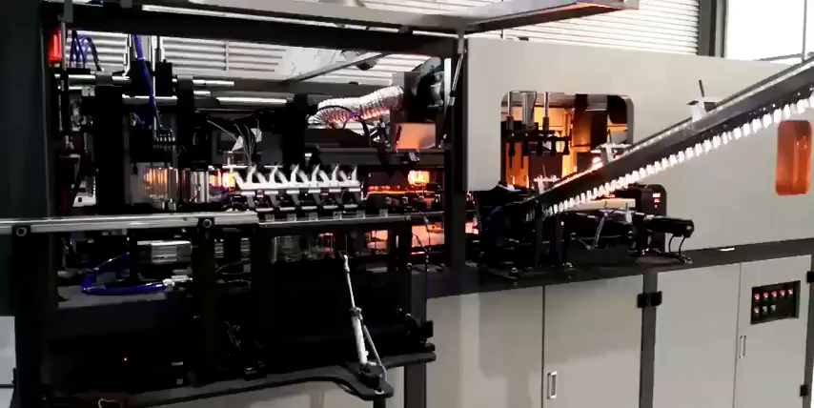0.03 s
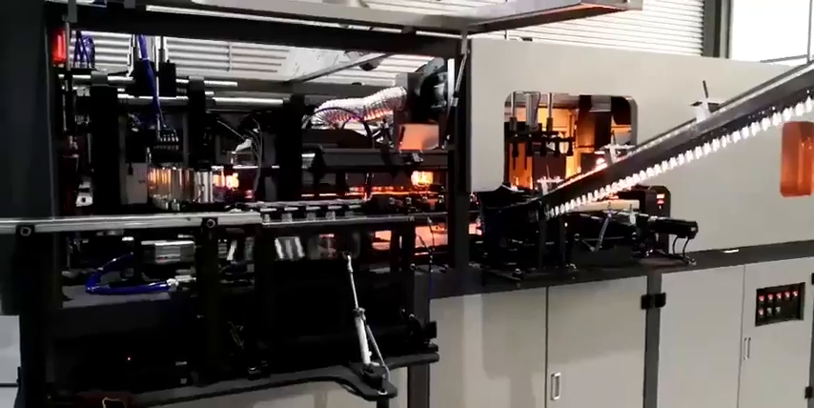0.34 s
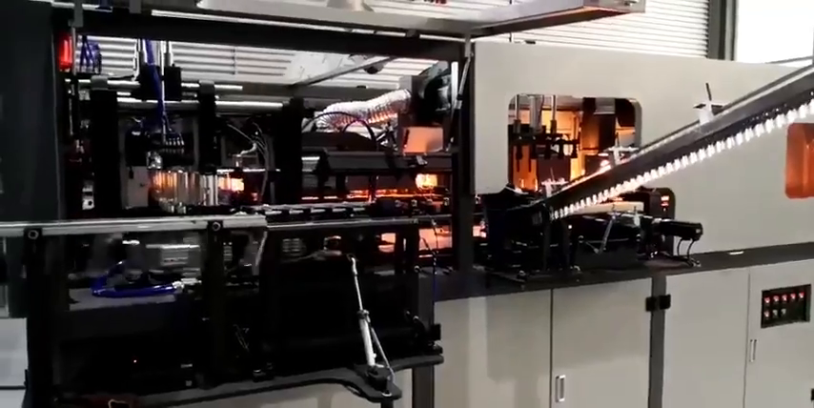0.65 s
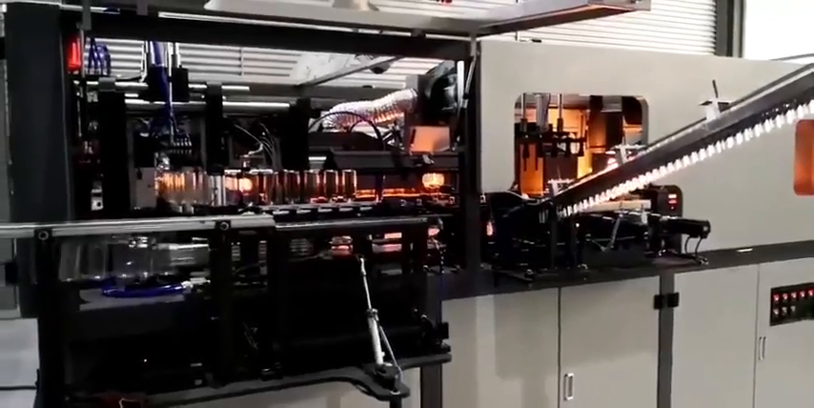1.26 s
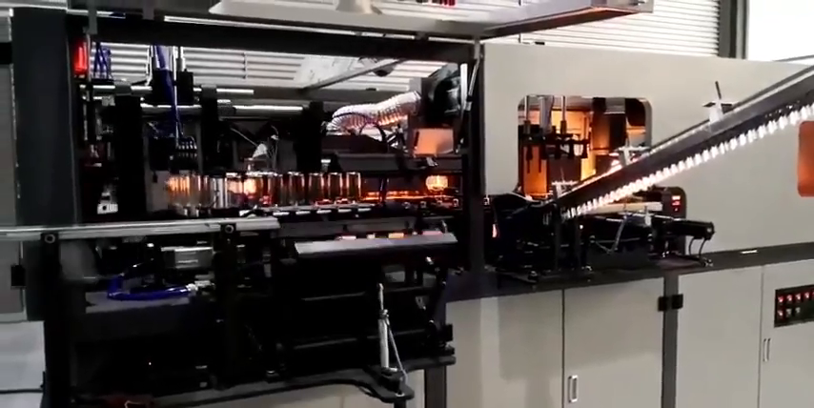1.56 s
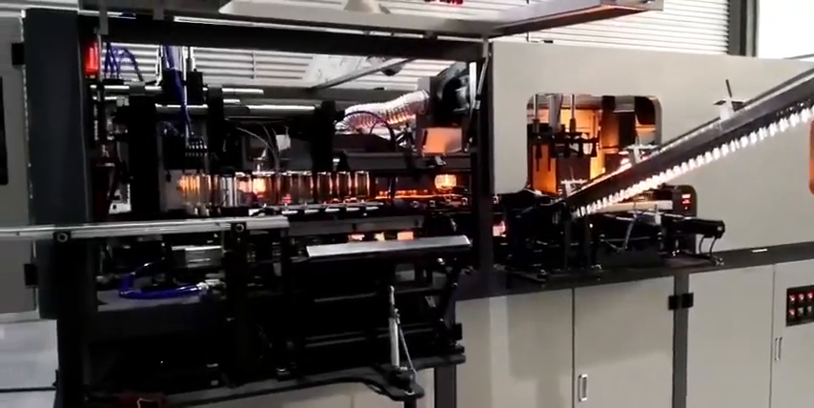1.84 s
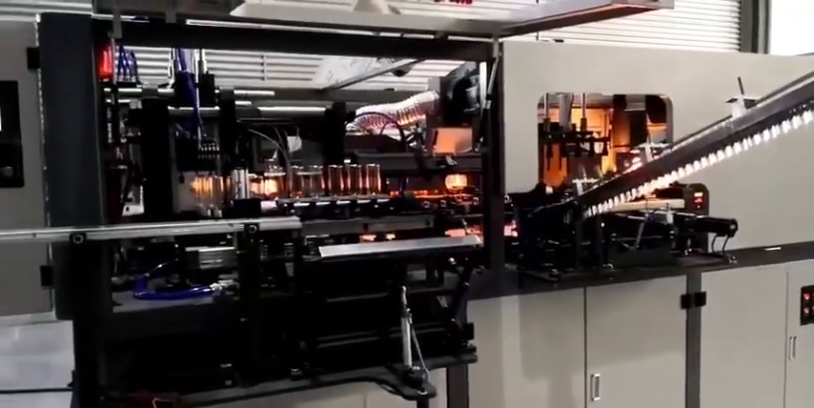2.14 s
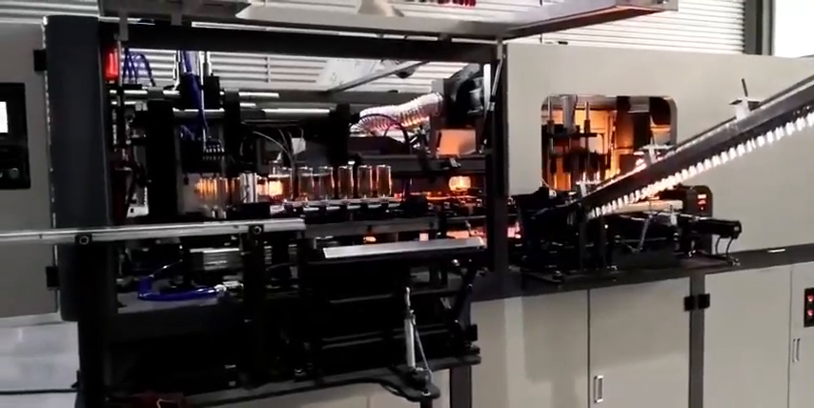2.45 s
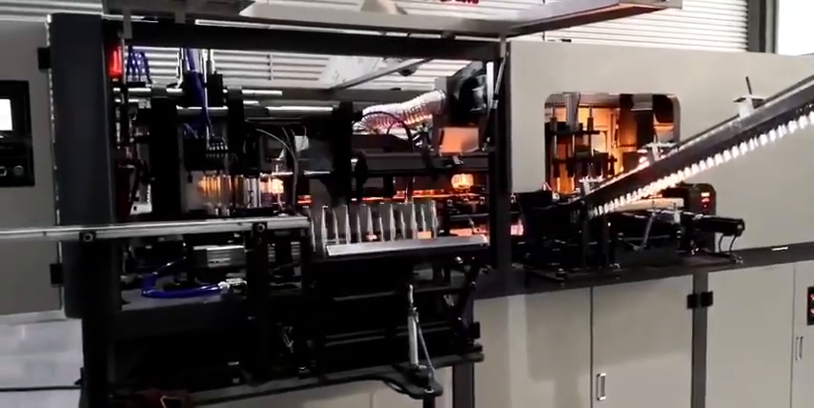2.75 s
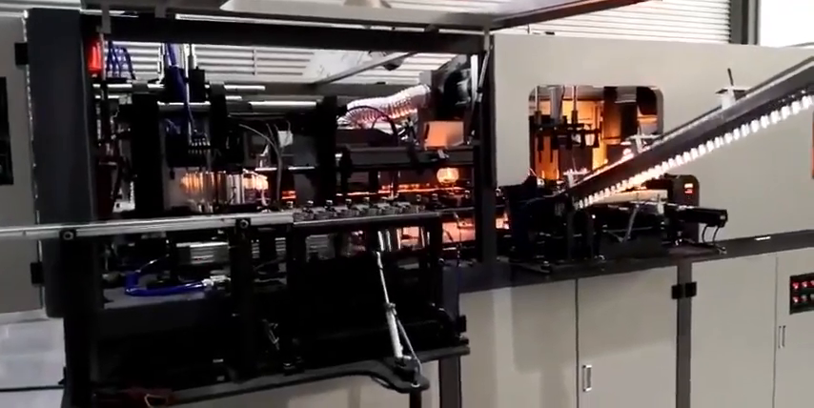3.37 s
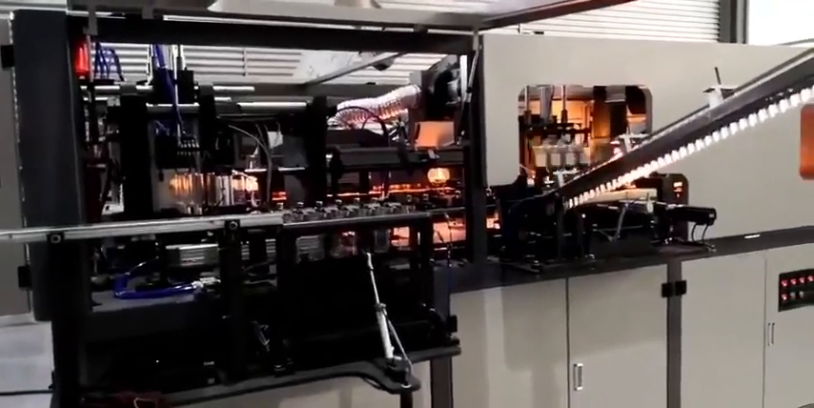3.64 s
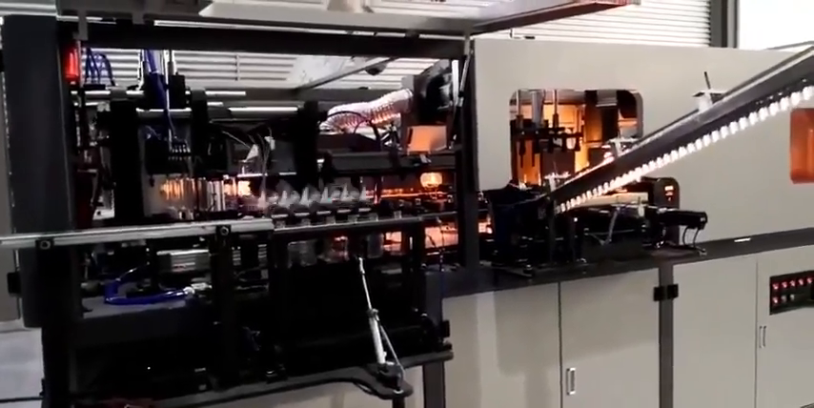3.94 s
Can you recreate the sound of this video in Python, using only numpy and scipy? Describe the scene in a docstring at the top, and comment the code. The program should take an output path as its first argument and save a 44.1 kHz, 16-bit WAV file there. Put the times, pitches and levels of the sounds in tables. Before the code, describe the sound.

In a noisy factory hall, a bottle blow moulding machine cycles over constant hiss and rumble. Two ringing air blasts come first, then sharp metal knocks, clanks and brief high squeals, and finally a third blast.

```python
"""Compressed air vents from a bottle blow moulding machine in three blasts through a ringing muffler.
Between the blasts the mould clamps with a clunk, the end stops knock hard,
and the steel transfer carriage rattles, clanks and squeals along its rail.
Underneath, the drive rumbles and drones, the air lines hiss and the factory hall keeps up its din."""
import sys
import numpy as np
from scipy import signal
from scipy.fft import rfft, irfft, next_fast_len
from scipy.io import wavfile
from scipy.ndimage import map_coordinates

SR = 44100
rng = np.random.default_rng(int(sys.argv[2]) if len(sys.argv) > 2 else 0)


def wav_out(sig):
    """Save sig, one row per channel (or a flat mono array), as 16-bit PCM at SR to the path in sys.argv[1]."""
    wavfile.write(sys.argv[1], SR, np.round(np.clip(np.atleast_2d(sig).T, -1, 1) * 32767).astype(np.int16))


N = 176400


def amp(db):
    """Decibels to gain."""
    return 10 ** (np.asarray(db) / 20)


def unit(x):
    """Scale to rms 1."""
    return x / np.sqrt(np.mean(x ** 2) + 1e-20)


def since(start):
    """Seconds since start, zero before it."""
    return np.maximum(np.arange(N) / SR - start, 0)


def curve(rows):
    """Automation lane through (t/s, value) breakpoints."""
    return np.interp(np.arange(N) / SR, *np.transpose(rows))


def swell(start, length):
    """Envelope that fades in, holds and fades out."""
    t = since(start)
    return np.clip(np.minimum(t, length - t) / 0.018, 0, 1)


def strike(start, db, t60, attack_s):
    """Impact envelope: quick rise, exponential tail."""
    t = since(start)
    return amp(db - 60 * t / t60) * (1 - np.exp(-t / attack_s))


def wobble(per_s):
    """Smooth random modulation with per_s knots a second."""
    return map_coordinates(rng.standard_normal(1024), [np.arange(N) * per_s / SR], mode="wrap")


def filtered(x, response):
    """Filter x by a gain that depends on frequency."""
    size = next_fast_len(N + 8192)
    return irfft(rfft(x, size) * response(np.fft.rfftfreq(size, 1 / SR)), size)[:N]


def colour(x, eq):
    """x through an EQ curve (f/Hz, gain/dB), at rms 1."""
    hz, db = np.transpose(eq)
    return unit(filtered(x, lambda f: amp(np.interp(np.log(f + 1), np.log(hz), db))))


def ring(x, modes):
    """x through resonators (f/Hz, width/Hz, gain/dB), at rms 1."""
    def response(f):
        return sum(amp(db) * 1j * f * width / (hz * hz - f * f + 1j * f * width)
                   for hz, width, db in modes)
    return unit(filtered(x, response))


def noise():
    """White noise."""
    return rng.standard_normal(N)


def eddies(patchy_db, patch_hz=169.4, patch_s=.035):
    """Turbulence whose strength drifts in patches of frequency and time."""
    hz, t, spectrum = signal.stft(noise(), SR, nperseg=512)
    grid = np.meshgrid(hz / patch_hz, t / patch_s, indexing="ij")
    patches = map_coordinates(rng.standard_normal((256, 256)), grid, mode="wrap")
    return signal.istft(spectrum * amp(patchy_db * patches), SR, nperseg=512)[1][:N]


def contacts(per_s, spread_db):
    """Random small impacts of uneven size, at rms 1."""
    clicks = (rng.random(N) < per_s / SR) * np.sign(noise())
    return unit(clicks * amp(spread_db * np.clip(noise(), -2, 2)))


def tone(hz, waver_hz):
    """A resonance whose pitch and strength waver, at rms 1."""
    phase = 2 * np.pi * np.cumsum(hz + waver_hz * wobble(110)) / SR
    return unit(np.sin(phase) * amp(2.2 * wobble(60)))


# Midrange bed of the hall: f/Hz, gain/dB
DIN_EQ = [(100, -29), (900, -18), (1200, -3.5), (1450, 0), (2000, 2), (2400, -2.5), (2900, -7), (3450, -5),
          (4000, -14), (5000, -19), (6000, -28.5), (7500, -32.5)]
# Gentle swells of the bed: t/s, level/dB
DIN_SWELLS = [(.26, -2), (.7, 0), (1.1, -0.5), (1.5, -0.5), (1.88, -2), (2.0, 2.5), (2.19, 1), (2.23, -2.5),
              (2.32, 1), (2.5, 2.5), (2.8, 1), (3.2, 0.5), (3.45, 0), (3.62, 0), (4, -1)]


def hall_din():
    """Air and fine clatter from the rest of the line."""
    stir = eddies(patchy_db=2.4) + .5 * contacts(per_s=500, spread_db=2)
    return amp(curve(DIN_SWELLS) - 20 + .9 * wobble(40)) * colour(stir, DIN_EQ)


# Fader ride of the hiss: t/s, level/dB
HISS_RIDE = [(.26, -25), (.42, -21.5), (.48, -25.5), (.8, -24), (1.1, -24), (1.15, -29), (1.25, -25),
             (1.56, -24), (1.72, -25.5), (1.98, -28.5), (2.12, -36), (2.42, -29.5), (2.75, -35),
             (3.12, -33.5), (3.2, -23.5), (3.35, -36.5), (3.62, -35.5), (3.68, -23), (4, -24.5)]
# Thin, bright hiss: f/Hz, gain/dB
HISS_EQ = [(1000, -38.5), (2500, -14.5), (3600, -5), (5000, -9.5), (5900, -12), (6600, -4.5), (7100, -2.5),
           (7500, 3.5), (7800, -11.5)]
# Cylinder puffs: t/s, length/s, level/dB
CYLINDER_PUFFS = [(1.414, .2, -27), (2.02, .06, -20), (2.394, 0.05, -20), (3.147, 0.1, -17.5),
                  (3.279, .06, -27), (3.848, .08, -14.5)]
# Breathy tone of a puff: f/Hz, gain/dB
PUFF_EQ = [(500, -20), (2000, 8.5), (3500, 2), (5000, -6), (6000, -8.5), (7400, -12)]


def air_lines():
    """The lines hiss throughout and the cylinders let out short puffs."""
    hiss_gain = amp(curve(HISS_RIDE) + 6.14 + 1.7 * wobble(45))
    puff_gain = sum(amp(db) * np.sin(np.pi * np.minimum(since(start) / length, 1))
                    for start, length, db in CYLINDER_PUFFS)
    return hiss_gain * colour(eddies(patchy_db=1.64), HISS_EQ) + puff_gain * colour(noise(), PUFF_EQ)


# Effort of the drive: t/s, level/dB
DRIVE_EFFORT = [(.26, -35), (.48, -34.5), (.58, -29), (.78, -27.5), (.9, -25.5), (1.16, -24), (1.23, -31),
                (1.6, -31), (1.7, -38), (1.85, -34.5), (1.98, -31), (2.2, -30), (2.58, -25.5), (2.7, -26),
                (3.18, -24), (3.6, -28), (3.75, -33.5), (4, -37)]
# Low body of the rumble: f/Hz, gain/dB
RUMBLE_EQ = [(25, -31), (45, -26.5), (75, -7.5), (120, -2), (220, 0.5), (320, 2.5), (480, -2), (700, -20),
             (1500, -20.5)]
# Fader ride of the panel clatter: t/s, level/dB
PANEL_RIDE = [(.26, -30), (.48, -37.5), (.6, -26), (.72, -33.5), (.87, -31), (.93, -26.5), (.98, -32),
              (1.15, -29.5), (1.5, -35), (1.83, -39), (2, -23.5), (2.2, -30.5), (2.42, -27), (2.62, -21.5),
              (2.82, -30.5), (2.9, -20), (3.03, -15.5), (3.09, -33.5), (3.16, -19.5), (3.45, -28.5),
              (3.55, -21), (3.62, -23.5), (3.7, -35.5), (4, -40.5)]
# Boxy tone of the panels: f/Hz, gain/dB
PANEL_EQ = [(250, -37.5), (500, -1.5), (790, 2), (900, 3), (1050, -1), (1200, -4), (1600, -25), (3000, -21)]
# Drones under load: t/s, length/s, f/Hz, level/dB
LOAD_DRONES = [(0.871, 0.35, 295.7, -33.5), (2.154, 0.4, 218.9, -31.5), (2.236, 0.4, 335, -26)]


def drive():
    """The drive rumbles, shakes the panels of the frame and drones under load."""
    rumble = amp(curve(DRIVE_EFFORT) + 0.5 + 1.9 * wobble(40)) * colour(noise(), RUMBLE_EQ)
    shaking = contacts(per_s=400, spread_db=2.5) + 1.4 * eddies(patchy_db=2.2)
    panels = amp(curve(PANEL_RIDE) + 1.7 * wobble(25.01)) * colour(shaking, PANEL_EQ)
    drones = sum(amp(db) * swell(start, length) * tone(hz, waver_hz=24.2)
                 for start, length, hz, db in LOAD_DRONES)
    return rumble + panels + drones


# Squeal cues: t/s, length/s, level/dB
RAIL_SQUEALS = [(1.967, 0.039, -23.5), (2.567, 0.07, -23), (2.838, 0.26, -27), (3.21, 0.18, -25.5)]


def rail_squeal():
    """Sliding makes the dry rail sing on one high, unsteady note."""
    envelope = sum(amp(db) * swell(start, length) for start, length, db in RAIL_SQUEALS)
    return envelope * tone(3280, waver_hz=30)


# Fader ride of the carriage rattle: t/s, level/dB
RATTLE_RIDE = [(1.85, -54), (1.98, -30), (2.2, -44), (2.52, -23.5), (2.63, -27), (2.82, -29.5), (3.02, -18),
               (3.1, -26.5), (3.32, -19), (3.43, -31.5), (3.6, -29.5), (3.7, -46)]
# Resonances of the steel rail: f/Hz, width/Hz, gain/dB
RAIL_MODES = [(860, 46, -13), (1528, 91, 3), (1733, 16, 7.5), (1862, 170, -4), (2240, 49, 2.5),
              (2380, 51, -7.5), (3247, 130, -11)]
# Loose steel hits, each with its strongest note: t/s, level/dB, t60/s, f/Hz
STEEL_CLANKS = [(.377, -16.5, .1, 1870), (.58, -25.5, 0.27, 1593), (.608, -22.5, 0.058, 1950),
                (.655, -18, 0.082, 2060), (.848, -23, 0.12, 1494), (1.483, -23, 0.18, 1900),
                (1.958, -23, 0.074, 2340), (1.975, -23.5, 0.2, 1796), (2.123, -15.5, 0.04, 2736),
                (2.153, -21.5, 0.13, 1520), (2.31, -25, 0.083, 2750), (2.592, -16.5, 0.052, 2260),
                (2.63, -22.5, 0.26, 1790), (2.706, -17.5, 0.058, 1730), (2.739, -17.5, 0.15, 2240),
                (2.775, -15, 0.039, 2280), (2.863, -19, 0.093, 2260), (2.906, -21.5, 0.17, 1750),
                (2.983, -23, 0.27, 1760), (3.022, -19.5, .12, 1580), (3.3, -25, 0.39, 2180),
                (3.53, -16.5, 0.24, 1484)]
# Bite of steel on steel: f/Hz, gain/dB
CLASH_EQ = [(200, -11), (800, -9), (1200, 0.5), (1550, -9), (2250, 11), (2800, -8.5), (4000, -24),
            (7500, -12.5)]


def carriage():
    """Small contacts keep the rail ringing; loose parts clank against it in short clusters."""
    rattle = amp(curve(RATTLE_RIDE)) * ring(contacts(per_s=260, spread_db=1), RAIL_MODES)
    clash = amp(-1.5) * colour(contacts(per_s=4000, spread_db=6), CLASH_EQ)
    rail_ring = amp(6) * ring(noise(), RAIL_MODES)
    clanks = np.zeros(N)
    for start, db, t60, hz in STEEL_CLANKS:
        note = amp(8.5) * np.sin(2 * np.pi * hz * since(start))
        clanks += strike(start, db, t60, attack_s=0.0029) * (clash + rail_ring + note)
    return rattle + clanks


# Hard hits on the end stops: t/s, level/dB, f/Hz
STOP_KNOCKS = [(2.008, 3, 1780), (2.1838, 1, 1600), (3.0776, 3.5, 1680), (3.0856, -4, 1600)]
# Partials of a knock: pitch ratio, gain/dB, t60/s
STOP_PARTIALS = [(0.761, -6, 0.023), (1, -2.5, .018), (1.12, -10, .018), (1.72, -11, 0.027)]
# Ringing tails of the steel frame: t/s, level/dB, t60/s, f/Hz
FRAME_TAILS = [(2.008, -9.5, 0.19, 1770), (2.055, -18, 0.52, 1890), (2.4, -22, .25, 700),
               (2.184, -20, 0.17, 1168)]


def end_stops():
    """Hard, well damped knocks, with the steel frame ringing on."""
    knocks = np.zeros(N)
    for start, db, hz in STOP_KNOCKS:
        for ratio, partial_db, t60 in STOP_PARTIALS:
            partial = np.sin(2 * np.pi * hz * ratio * since(start))
            knocks += strike(start, db + partial_db, t60, attack_s=.0003) * partial
    tails = sum(strike(start, db, t60, attack_s=0.0055) * tone(hz, waver_hz=15)
                for start, db, t60, hz in FRAME_TAILS)
    return knocks + tails


# Locking hits: t/s, clunk level/dB, thump level/dB
MOULD_CLAMPS = [(2.009, -19, -15.5), (2.041, -16, -41), (2.052, -18, -35), (2.12, -20, -25),
                (2.182, -30, -27)]
# Resonances of the mould: f/Hz, width/Hz, gain/dB
MOULD_MODES = [(710, 70, -37), (980, 93, 3), (1050, 78, 0), (1910, 66, 0), (2700, 170, -5)]
# Weight under the clunk: f/Hz, gain/dB
THUMP_EQ = [(25, -13), (60, 1), (120, -6.5), (330, 6), (600, -21), (2000, -49)]


def mould():
    """The mould halves lock: a steel clunk over a low thump."""
    clunk = sum(strike(start, db, t60=0.25, attack_s=0.0014) for start, db, _ in MOULD_CLAMPS)
    thump = sum(strike(start, db, t60=0.088, attack_s=0.0017) for start, _, db in MOULD_CLAMPS)
    return clunk * ring(noise(), MOULD_MODES) + thump * colour(noise(), THUMP_EQ)


# Air blasts: t/s, hold/s, level/dB, opening surge/dB, release/(dB/s)
EXHAUST_BLASTS = [(0.246, 0.15, -14.5, 3, 98), (1.197, 0.57, -13.5, 0, 84.5), (3.646, .4, -13, 4, 100)]
# Resonances of the muffler: f/Hz, width/Hz, gain/dB
MUFFLER_MODES = [(1383, 37, -2.5), (1659, 140, -2), (1851, 69, 4), (2108, 27, -0.5), (3390, 90, -5)]
# Passband of the muffler: f/Hz, gain/dB
MUFFLER_EQ = [(700, -20.5), (1100, -14), (1330, 1), (3500, 0), (6000, -3)]
# Bright edge of the jet: f/Hz, gain/dB
JET_EQ = [(100, -29.5), (1000, -25.5), (1350, -27.5), (2000, -26.5), (2600, 6.5), (3300, 4), (4200, -1.5),
          (5000, -8.5), (5900, -10.5), (7400, 3)]


def exhaust(valve_s=0.002, surge_s=0.053):
    """A valve opens, the air surges and flutters through the muffler, then dies away."""
    flow = np.zeros(N)
    for start, hold, db, surge_db, release in EXHAUST_BLASTS:
        t = since(start)
        opening = 1 - np.exp(-t / valve_s)
        flow += opening * amp(db + surge_db * np.exp(-t / surge_s) - release * since(start + hold))
    muffler = colour(ring(noise(), MUFFLER_MODES), MUFFLER_EQ)
    jet = amp(-2.5 + 1.5 * wobble(28)) * colour(eddies(patchy_db=1.5), JET_EQ)
    flutter = amp(1.1 * wobble(55))
    return flow * (muffler * flutter + jet)


def scene():
    """The machine over the din of the factory, in mono."""
    bed = hall_din() + air_lines() + drive()
    steel = rail_squeal() + carriage() + end_stops() + mould()
    return (bed + steel + exhaust())[None]


# Treble ripple of the microphone: f/Hz, gain/dB
MIC_EQ = [(4500, 0), (5200, 1.5), (5850, 0), (6150, 0), (6400, 1.5), (7000, 0), (7500, -1)]


def record(dry, cut_in_s=.2485, top_hz=7650, ceiling=.97):
    """The microphone colours the sound; it cuts in abruptly, with peaks rounded and the top cut off."""
    hz, db = np.transpose(MIC_EQ)
    coloured = filtered(dry[0], lambda f: amp(np.interp(f, hz, db)) * (f < top_hz))
    gated = coloured * np.minimum(since(cut_in_s) / .002, 1)
    rounded = gated / (1 + np.abs(gated / ceiling) ** 8) ** (1 / 8)
    return filtered(rounded, lambda f: np.clip((top_hz - f) / 100, 0, 1))[None]


dry = scene()
out = record(dry)
wav_out(out)
```